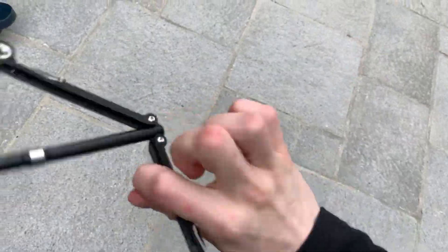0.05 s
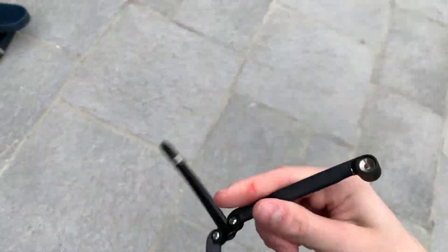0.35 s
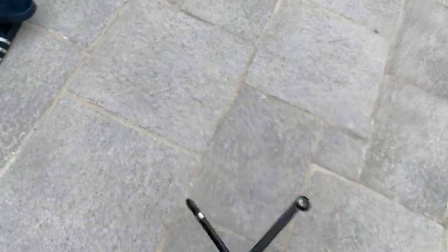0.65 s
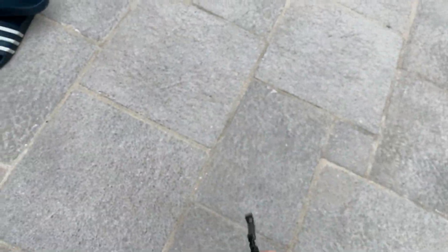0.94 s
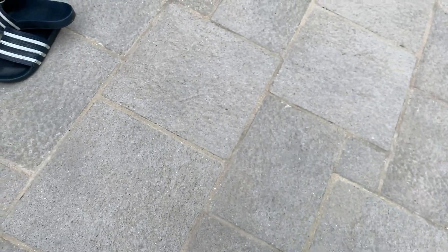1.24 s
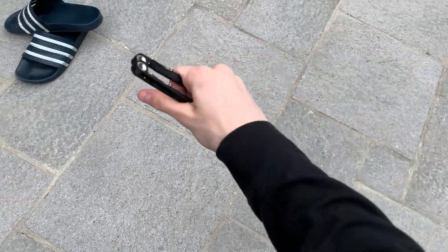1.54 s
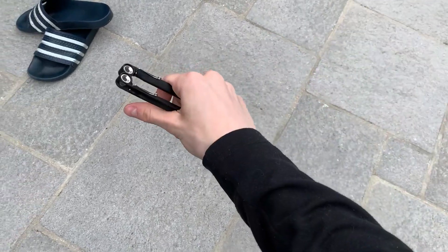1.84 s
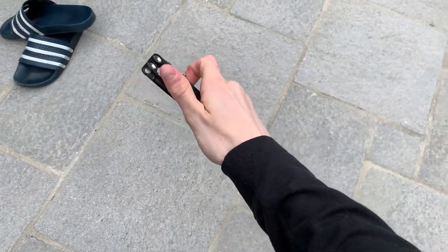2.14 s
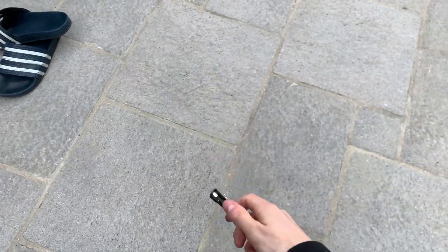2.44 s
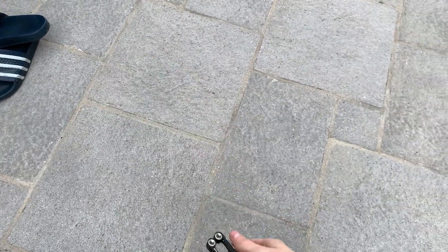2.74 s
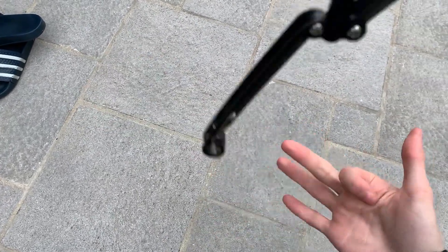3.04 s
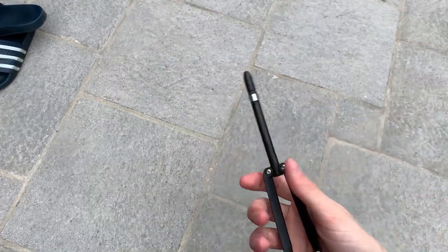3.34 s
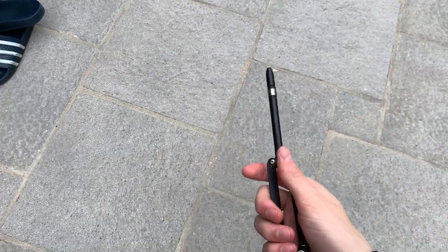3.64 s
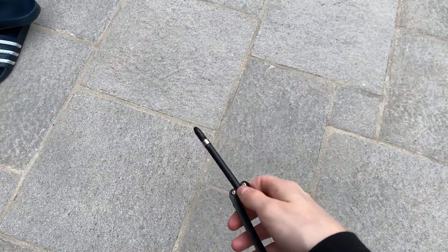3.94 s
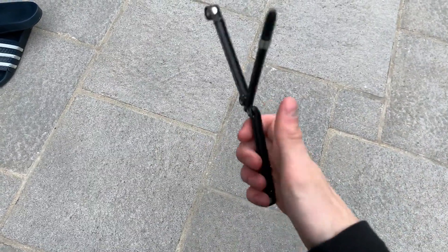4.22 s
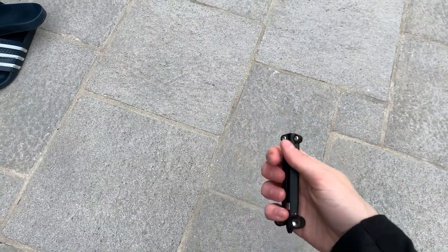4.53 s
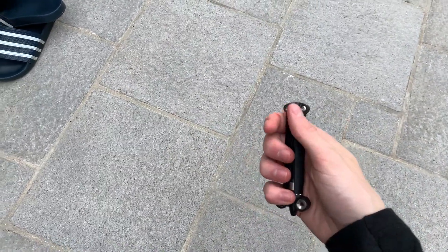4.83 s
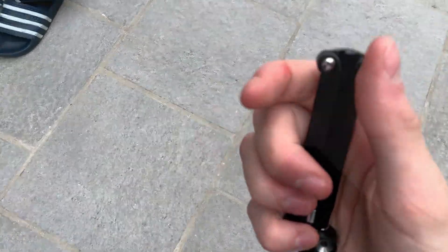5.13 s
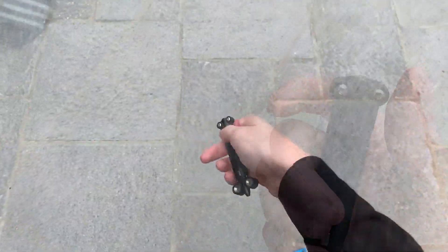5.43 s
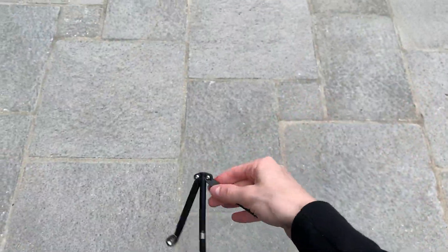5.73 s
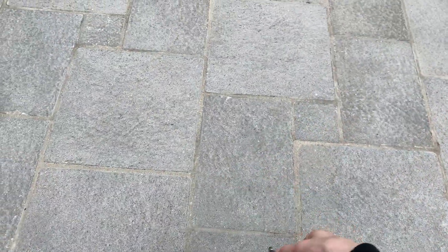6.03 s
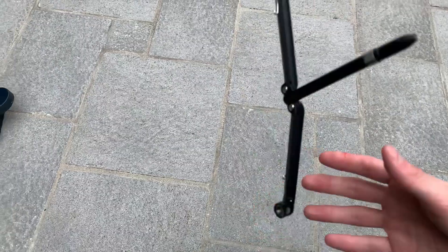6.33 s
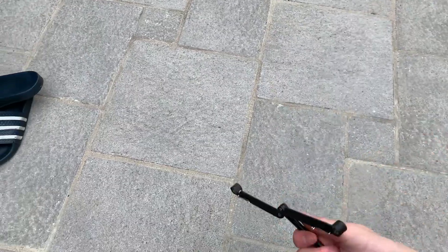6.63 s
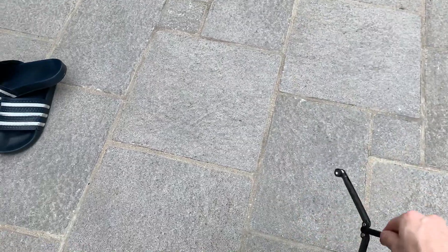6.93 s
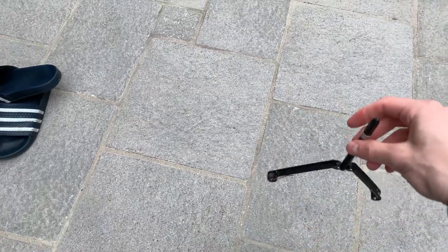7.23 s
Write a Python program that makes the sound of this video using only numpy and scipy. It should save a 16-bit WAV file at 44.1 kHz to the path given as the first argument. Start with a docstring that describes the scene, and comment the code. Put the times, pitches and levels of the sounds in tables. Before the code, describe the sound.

Sharp clacks and light ticks of a butterfly-style folding pen being flipped outdoors, over faint distant traffic, with one gust buffeting the microphone.

```python
"""A butterfly-style folding pen, flipped and caught close to a hand-held stereo microphone on a stone patio.
Its two handles clack against the pen and each other, the pivots tick in between, and paving and walls
throw a little back. Far off lie traffic and an engine; a breeze rumbles under a faint hiss.
One gust buffets the microphone, the sound drops out briefly, and the flipping goes on
against a duller background."""
import sys
import numpy as np
from scipy import signal
from scipy.fft import rfft, irfft
from scipy.io import wavfile

SR = 44100
rng = np.random.default_rng(int(sys.argv[2]) if len(sys.argv) > 2 else 0)


def int16_out(signal):
    """Quantize to a 16-bit WAV file."""
    q = np.round(np.clip(np.atleast_2d(signal).T, -1, 1) * 32767)
    wavfile.write(sys.argv[1], SR, q.astype(np.int16))


N = 329427
TIME = np.arange(N) / SR
HZ = np.maximum(np.arange(N // 2 + 1) * SR / N, 1)

# Levels in the tables are relative; the functions set the final gain.
# the microphone's two ports in sound from all around: f/Hz, likeness (0-1), left lead/rad
DIFFUSE_PORTS = [(100, .92, 0), (270, .85, 0), (430, .5, -.7), (700, .55, -2.6), (1500, .5, -3.5),
                 (2500, .3, -6.2), (5000, .2, -12), (6800, .5, -12), (9700, .95, -9.4), (13200, .9, -6.3),
                 (16000, .6, -3.7)]
# the same ports with a source close in front: f/Hz, left minus right/dB, left lead/rad
CLOSE_PORTS = [(250, 0, 0), (750, -4, -1.8), (1150, -7, -2.6), (1600, -5, -2.3), (2100, -1, -2.8),
               (2500, 0, -3.9), (2900, 0, -3.9), (3700, 3.5, -4.9), (4700, 6.5, -6.6), (5600, 4, -9.8),
               (6700, 0, -12.3), (9700, 0, -9.4), (13200, 0, -6.3), (16000, 0, -3.8)]
# the brief dropout: t/s, gain
DROPOUT_GAIN = [(5.24, 1), (5.272, 0), (5.34, 0), (5.352, 1)]
# distant traffic before the dropout: f/Hz, level/dB
TRAFFIC_COLOUR = [(76, -29), (130, -1.5), (232, -3), (286, -6.5), (490, -12), (544, -11), (680, -10.5),
                  (1060, -7), (1420, -16), (2400, -22.5), (3000, -31.5), (3900, -60), (6600, -120)]
# distant traffic after it: f/Hz, level/dB
TRAFFIC_LATER_COLOUR = [(76, -40.5), (130, -5), (219, -0.5), (368, -11), (527, -7), (726, -10.5),
                        (1000, -5.5), (1250, -13), (1970, -21), (5370, -44), (8340, -48.5), (9400, -49.5),
                        (10600, -47.5), (14300, -46.5), (15500, -62)]
# spectrum of the faint hiss: f/Hz, level/dB
FAINT_HISS_COLOUR = [(1200, -15.5), (2200, -2.5), (3200, 1), (5000, -2), (6800, -8), (8500, -12.5),
                     (12000, -20), (15000, -18), (16000, -32.5)]
# rise and fall of the hiss: t/s, level/dB
HISS_LEVEL = [(0.0, -62.5), (0.45, -64.5), (2.24, -66), (3.33, -60), (3.68, -60.5), (5.05, -63.5)]
# long swells of the far engine: t/s, half length/s, level/dB
ENGINE_SWELLS = [(1.53, 0.29, -48), (1.8, 1.58, -50), (5.6, 1.1, -48.5), (6.9, 0.28, -45)]
# rumble of the breeze: f/Hz, level/dB
BREEZE_COLOUR = [(25, -23), (40, -0.5), (60, 5), (80, 0.5), (110, 1), (150, -21), (220, -23.5),
                 (400, -62.5)]
# puffs in the breeze: t/s, half length/s, level/dB
BREEZE_PUFFS = [(0.32, .08, -49), (1.2, 0.051, -50.5), (2.05, 0.23, -48), (2.55, 0.16, -61.5),
                (4.1, 0.15, -52.5), (4.51, 0.037, -40.5)]
# the gust on the microphone: f/Hz, level/dB
TURBULENCE_COLOUR = [(15, -39), (28, -18), (42, 2.5), (75, 6.5), (120, 0.5), (190, -2.5), (330, -18),
                     (520, -22), (750, -39), (1100, -57), (2000, -76), (4000, -100)]
# single eddies that hit the ports: t/s, level/dB, rise time/s
EDDIES = [(0.944, -33, 0.0082), (2.102, -32, .008), (2.143, -29.5, 0.011), (3.593, -41, 0.011),
          (4.177, -34.5, .007), (4.466, -30.5, 0.0059), (4.9594, -5.5, 0.0065), (5.004, -15.5, .004),
          (5.016, -14, 0.0061), (5.033, -17, 0.0025), (5.049, -11, 0.0019), (5.131, -18, 0.0017),
          (5.192, -14.5, 0.0024)]
# sound scattered by the patio: f/Hz, level/dB
PATIO_COLOUR = [(500, -2), (1500, 2), (3200, 8.5), (4800, 0), (7000, 0.5), (12000, -2), (16000, -8.5)]
# the pivots rub as a handle swings round: t/s, half length/s, level/dB
HANDLE_SWINGS = [(0.366, 0.045, -63.5), (0.568, 0.024, -67), (1.35, 0.073, -57.5), (2.797, .02, -60),
                 (3.274, 0.023, -58.5), (4.325, 0.037, -61.5), (4.39, 0.03, -59.5), (5.888, 0.009, -68),
                 (6.518, 0.015, -56), (6.581, 0.021, -68), (7.101, 0.027, -75.5), (7.36, 0.033, -69.5)]
# slipping pivot washers: f/Hz, level/dB
WASHER_COLOUR = [(2000, -29.5), (3300, -2.5), (4300, 2.5), (5500, -9.5), (7500, -3.5), (10000, -5.5),
                 (13000, -2.5), (15500, -5.5), (16500, -13.5)]
# modes of the hand-damped handles: f/Hz, level/dB, t60/s
DAMPED_MODES = [(770, -11.5, 0.026), (1090, -10, 0.023), (1456, -13.5, 0.0078), (2370, -5.5, 0.011),
                (2860, -5.5, 0.014), (3590, -4, 0.0087), (4680, -8.5, 0.0028), (5700, -4, 0.0074),
                (6620, 0.5, .008), (7730, -0.5, 0.008), (8570, 5.5, 0.0088), (8930, 0.5, .006),
                (10810, 2.5, 0.007), (11600, 5, 0.0072), (13160, 4, .007), (13800, 2.5, 0.0077),
                (14700, -2, .007)]
# knock, clack and tick registers: low f/Hz, high f/Hz
REGISTER_BANDS = [(1700, 5100), (5400, 9800), (10200, 16200)]
# a handle strikes the pen or its twin: t/s, level/dB, brightness/dB, thock f/Hz, knock f/Hz, clack f/Hz,
# rebound gap/s, base loss per rebound/dB
HANDLE_BLOWS = [(0.0706, -17, 4, 750, 2400, 8600, .0016, 15),
                (0.0758, -36, -8.5, 757, 4400, 6620, .008, 14),
                (0.359, -43.5, -2.5, 1114, 4600, 6050, .003, 18),
                (0.3816, -50.5, -2, 1100, 4600, 5900, .007, 4),
                (0.5516, -47.5, -7.5, 1100, 4620, 6900, 0.013, 12),
                (0.7955, -29.5, 7, 1100, 3830, 5330, .008, 25),
                (1.2526, -36, 3, 2250, 2650, 8300, 0.004, 7.5),
                (1.354, -14, 4.5, 1100, 4670, 6150, 0.0035, 15),
                (3.041, -63, 3, 1100, 4000, 7500, .003, 12), (3.2575, -43.5, 6, 1100, 3590, 7460, .003, 12),
                (3.2662, -34, 1, 1210, 4700, 8000, .0022, 6),
                (3.2995, -27, -3, 1340, 3760, 7500, 0.0033, 26),
                (3.3293, -33, -5.5, 2110, 3700, 6100, 0.0018, 20),
                (4.258, -52.5, -7, 1100, 4800, 5630, .003, 5),
                (4.353, -30, 3.5, 1410, 3620, 6260, .0033, 25),
                (4.716, -57.5, -5, 1100, 4000, 5870, 0.0024, 16),
                (5.7829, -64, -8, 1100, 2600, 5750, .003, 14),
                (5.8876, -62, -11.5, 1100, 3860, 5680, .003, 16),
                (6.5047, -41, 2, 1600, 4420, 6600, 0.0033, 20.5),
                (6.518, -44.5, -5, 1590, 3030, 8970, .0056, 8),
                (6.5384, -42.5, 5, 1000, 4280, 5770, .0046, 10),
                (7.0315, -68.5, 0, 1100, 2600, 5820, .003, 14),
                (7.3738, -65, -5.5, 1095, 4920, 8890, 0.0022, 14.5)]

AFTER_DROPOUT = TIME > DROPOUT_GAIN[1][0]   # from the moment of silence on
REGISTER_FILTERS = [signal.butter(4, band, "band", fs=SR, output="sos") for band in REGISTER_BANDS]


def from_db(db):
    """Decibels to gain."""
    return 10 ** (np.asarray(db) / 20)


def rms_one(x):
    """Scale to unit rms."""
    return x / np.sqrt(np.mean(x ** 2) + 1e-20)


def in_time(rows):
    """A curve at every sample."""
    return np.interp(TIME, *np.transpose(rows))


def in_hz(rows, column=1):
    """One column of a spectrum at every frequency."""
    rows = np.array(rows)
    return np.interp(np.log(HZ), np.log(rows[:, 0]), rows[:, column])


def passed(x, hz, kind, order=2):
    """Causal Butterworth filter."""
    return signal.sosfilt(signal.butter(order, hz, kind, fs=SR, output="sos"), x)


def drift(per_s):
    """A slow random wander of unit rms."""
    knots = rng.standard_normal(int(per_s * N / SR) + 2)
    return rms_one(np.interp(TIME * per_s, np.arange(len(knots)), knots))


def swells(rows):
    """Gain of bell-shaped swells, each given by its time, half length and level."""
    return sum(from_db(db) * np.exp(-np.minimum(((TIME - s) / half) ** 2, 30)) for s, half, db in rows)


def diffuse(colour):
    """Coloured noise of unit rms, reaching the microphone's two ports from all around."""
    left, unrelated = rfft(rng.standard_normal((2, N)))
    alike = np.clip(in_hz(DIFFUSE_PORTS), 0, 1)
    lag = np.exp(-1j * in_hz(DIFFUSE_PORTS, column=2))
    right = (alike * left + np.sqrt(1 - alike ** 2) * unrelated) * lag
    return rms_one(irfft(np.array([left, right]) * from_db(in_hz(colour)), N))


def traffic_and_hiss(traffic_db, later_db, hiss_gain_db):
    """A wash of distant traffic, with a faint hiss that ends at the dropout."""
    traffic = from_db(traffic_db) * diffuse(TRAFFIC_COLOUR)
    hiss = from_db(in_time(HISS_LEVEL) + hiss_gain_db) * diffuse(FAINT_HISS_COLOUR)
    later = from_db(later_db) * diffuse(TRAFFIC_LATER_COLOUR)
    return np.where(AFTER_DROPOUT, later, traffic + hiss)


def engine(start_hz, sag_hz_per_s, later_hz, waver_hz, waver_db):
    """A far engine drones unsteadily, sagging in pitch, and sits lower after the dropout."""
    hz = np.where(AFTER_DROPOUT, later_hz, start_hz - sag_hz_per_s * TIME) + waver_hz * drift(5)
    drone = np.sqrt(2) * np.sin(2 * np.pi * np.cumsum(hz) / SR)
    return swells(ENGINE_SWELLS) * from_db(-waver_db * drift(7)) * drone


def breeze(base_db, later_db, lumpy_db):
    """Air moving over the patio rumbles unevenly and freshens in puffs."""
    strength = from_db(np.where(AFTER_DROPOUT, later_db, base_db)) + swells(BREEZE_PUFFS)
    return strength * from_db(lumpy_db * drift(10)) * diffuse(BREEZE_COLOUR)


def gust(level_db, arrives_s, hold_s, rise_db_per_s, fall_db_per_s, flutter_db):
    """Turbulence right on the microphone swells, holds and dies away until the dropout ends it."""
    age = TIME - arrives_s
    shape_db = np.clip(np.minimum(rise_db_per_s * age, fall_db_per_s * (hold_s - age)), -120, 0)
    turbulence = from_db(level_db + shape_db) * diffuse(TURBULENCE_COLOUR) * (TIME < DROPOUT_GAIN[2][0])
    # small whirls flutter on the crests of the large ones
    whirls = rms_one(passed(rng.standard_normal((2, N)), [400, 750], "band", order=3))
    crests = np.maximum(passed(turbulence, 100, "low"), 0)
    return turbulence + from_db(flutter_db) * crests * whirls


def eddies(gain_db, full_scale_hz, hz_per_db, port_hz, glide_s):
    """Each eddy jolts the ports with a thud that glides into the bass; a harder one starts higher."""
    out = np.zeros(N)
    t = TIME[:SR // 8]
    for s, db, rise_s in EDDIES:
        start_hz = max(full_scale_hz + hz_per_db * db, port_hz)
        hz = port_hz + (start_hz - port_hz) * np.exp(-t / glide_s)
        envelope = (t / rise_s) * np.exp(1 - t / rise_s)
        jolt = envelope * np.sin(2 * np.pi * np.cumsum(hz) / SR)
        at = round(s * SR)
        out[at:at + len(t)] += from_db(db + gain_db) * passed(jolt, [35, 1600], "band")
    return out


def patio(x, ground_db, ground_s, early_db, early_t60, wall_db, wall_s, wall_t60):
    """A bounce off the paving, scatter from things close by, then a longer scatter off the walls."""
    t = TIME[:SR // 3]
    early = from_db(-60 * t / early_t60) * np.clip(t / ground_s, 0, 1)
    walls = from_db(-60 * t / wall_t60) * np.clip((t - wall_s) / .003, 0, 1)
    fade = from_db(early_db) * early / np.linalg.norm(early)
    fade += from_db(wall_db) * walls / np.linalg.norm(walls)
    response = diffuse(PATIO_COLOUR)[:, :len(t)] * fade
    response[:, round(ground_s * SR)] += from_db(ground_db)
    return signal.oaconvolve(x[None], response, axes=1)[:, :N]


def close_up(x):
    """Sound from close in front reaches the two ports with a difference in level and phase."""
    shade = from_db(in_hz(CLOSE_PORTS) / 2)
    lag = np.exp(-1j * in_hz(CLOSE_PORTS, column=2))
    return irfft(rfft(x) * np.array([shade, lag / shade]), N)


def pivots(gain_db, slips_per_s, spread_db):
    """Dense tiny slips of the pivot washers, swelling and fading with each swing."""
    slips = (rng.random(N) < slips_per_s / SR) * rng.choice([-1, 1], N)
    slips = slips * from_db(spread_db * rng.standard_normal(N))
    rubbing = rms_one(irfft(rfft(slips) * from_db(in_hz(WASHER_COLOUR)), N))
    speed = np.zeros(N)
    for s, half, db in HANDLE_SWINGS:
        during = np.abs(TIME - s) < 2 * half
        speed[during] += from_db(db) * np.exp(-((TIME[during] - s) / half) ** 2)
    return from_db(gain_db) * speed * rubbing


def handle_ring(vary_db):
    """The handles ring from a blow at one spot, which sets the strength and sign of every mode."""
    t = TIME[:SR // 50]
    hz, mode_db, t60 = np.transpose(DAMPED_MODES)[:, :, None]
    strength = from_db(mode_db + vary_db * rng.standard_normal(hz.shape))
    sign = rng.choice([-1, 1], hz.shape)
    return np.sum(sign * strength * np.sin(2 * np.pi * hz * t) * from_db(-60 * t / t60), axis=0)


def strike(crack_db, crack_s, chatter_db, chatter_s):
    """A crack and the ring of the handles, re-excited as the loose parts chatter."""
    ring = handle_ring(vary_db=0.5)
    t = TIME[:len(ring)]
    force = from_db(chatter_db) * rng.standard_normal(len(t)) * np.exp(-t / chatter_s)
    force[0] += 1   # the blow itself
    bright_noise = passed(rng.standard_normal(len(t)), 3300, "high", order=1)
    crack = bright_noise * (t / crack_s) * np.exp(1 - t / crack_s)
    return signal.fftconvolve(ring, force)[:len(t)] + from_db(crack_db) * crack


def contact_tone(sound, levels_db, thock_hz, favoured_hz, lift_db, q, body_db):
    """Where and how hard the parts meet favours two resonances and sets each register's level."""
    # the whole handle recoils with a low thock that follows the strength of the knock
    body = passed(sound, [.8 * thock_hz, 1.25 * thock_hz], "band")
    out = from_db(levels_db[0] + body_db) * body / np.std(body[:SR // 200])
    for hz in favoured_hz:
        sound = sound + from_db(lift_db) * signal.lfilter(*signal.iirpeak(hz, q, fs=SR), sound)
    for db, sos in zip(levels_db, REGISTER_FILTERS):
        register = signal.sosfilt(sos, sound)
        out += from_db(db) * register / np.std(register[:SR // 500])   # level over the first 2 ms
    return out


def handles(knock_db, clack_db, tick_db, crack_db, lift_db, grip_db=4):
    """Each handle blow rebounds three times, unevenly but on the same spot, and so rings alike."""
    out = np.zeros(N + SR)
    for s, db, bright_db, thock_hz, knock_hz, clack_hz, gap_s, loss_db in HANDLE_BLOWS:
        sound = strike(crack_db, crack_s=0.00017, chatter_db=-22.5, chatter_s=0.0025)
        # brightness trades knock for tick
        levels_db = (db - bright_db + knock_db, db + clack_db, db + bright_db + tick_db)
        hit = contact_tone(sound, levels_db, thock_hz, (knock_hz, clack_hz), lift_db, q=17, body_db=-7)
        for k, uneven in enumerate(rng.uniform(.85, 1.15, 4)):
            # the grip closes, so each rebound loses more than the one before
            rebound_db = -k * loss_db - k * (k - 2) * grip_db
            at = round(s * SR)
            out[at:at + len(hit)] += from_db(rebound_db) * hit
            s += gap_s * uneven
    return out[:N]


def scene():
    """The pen close up, the patio around it, traffic and engine far off, wind on the microphone."""
    rubbing = pivots(gain_db=0.5, slips_per_s=3300, spread_db=5.5)
    direct = handles(knock_db=-9, clack_db=-3.5, tick_db=-3, crack_db=14, lift_db=2) + rubbing
    # summed over all directions the modes even out, so the surroundings return mostly the crack
    radiated = handles(knock_db=-7, clack_db=1, tick_db=-2, crack_db=34.5, lift_db=-21.5) + rubbing
    scatter = patio(radiated, ground_db=-31.5, ground_s=0.0053, early_db=-14, early_t60=0.04,
                    wall_db=-23, wall_s=0.011, wall_t60=0.18)
    ambience = breeze(base_db=-51.5, later_db=-49.5, lumpy_db=2)
    ambience += traffic_and_hiss(traffic_db=-49.5, later_db=-51, hiss_gain_db=2.5)
    ambience += engine(start_hz=81.7, sag_hz_per_s=2.2, later_hz=57, waver_hz=.8, waver_db=1)
    wind = gust(level_db=-16, arrives_s=4.96, hold_s=0.18, rise_db_per_s=336, fall_db_per_s=141.5,
                flutter_db=-28.5)
    wind += eddies(gain_db=-0.5, full_scale_hz=1008, hz_per_db=28, port_hz=73.7, glide_s=0.0034)
    return close_up(direct) + scatter + ambience + wind


def record(dry):
    """The sound drops out for a moment, the hardest clacks are limited, and the top is cut."""
    ceiling, stopband_hz = .68, 17000
    limited = np.clip(dry * in_time(DROPOUT_GAIN), -ceiling, ceiling)
    return signal.sosfilt(signal.cheby2(16, 70, stopband_hz, fs=SR, output="sos"), limited)


dry = scene()
out = record(dry)
int16_out(out)
```